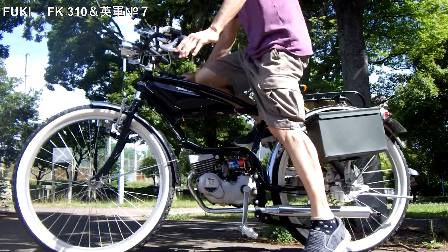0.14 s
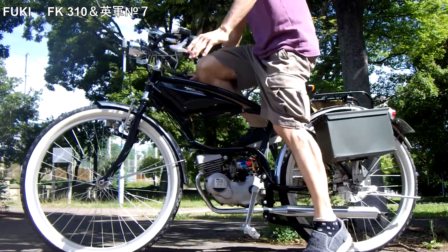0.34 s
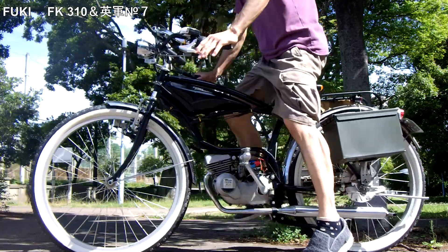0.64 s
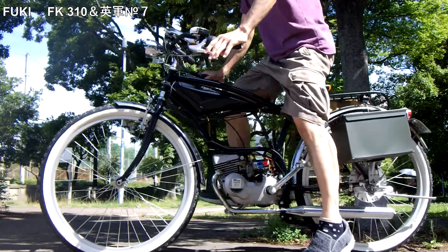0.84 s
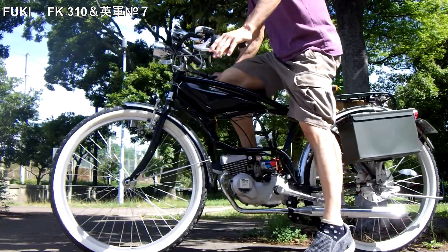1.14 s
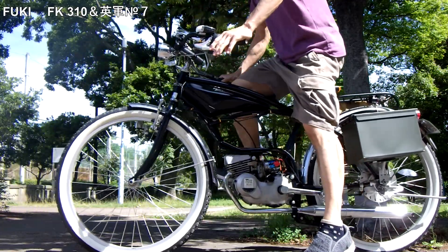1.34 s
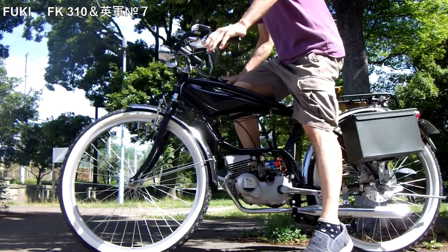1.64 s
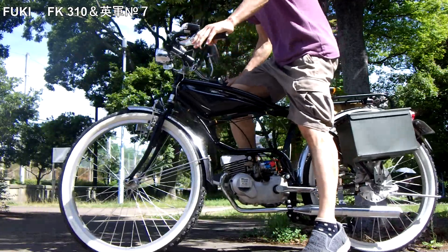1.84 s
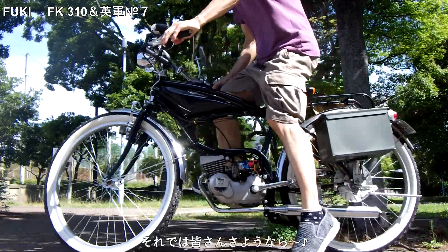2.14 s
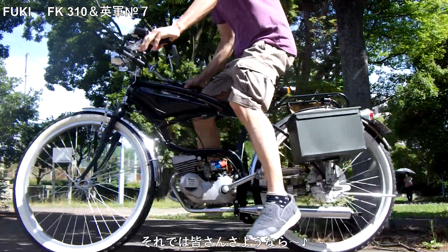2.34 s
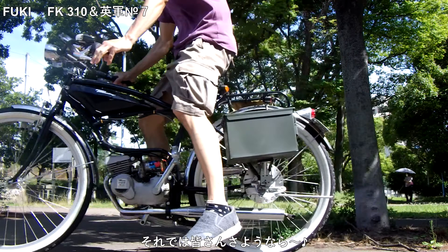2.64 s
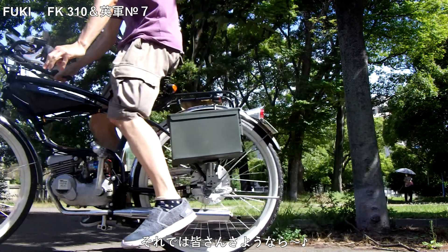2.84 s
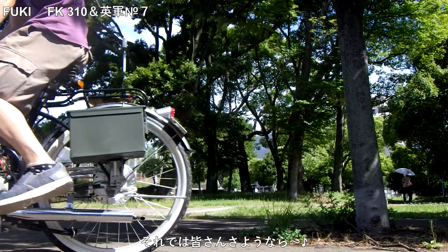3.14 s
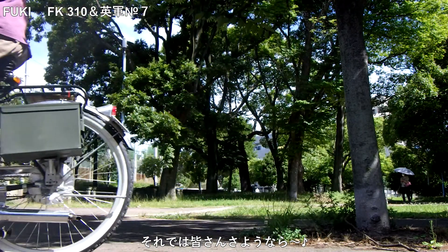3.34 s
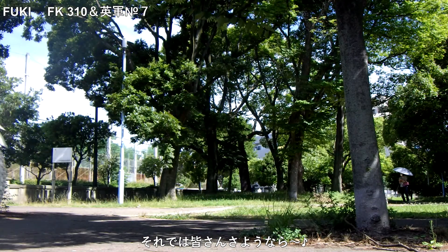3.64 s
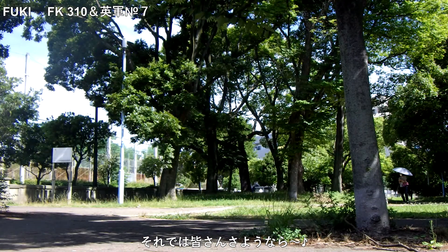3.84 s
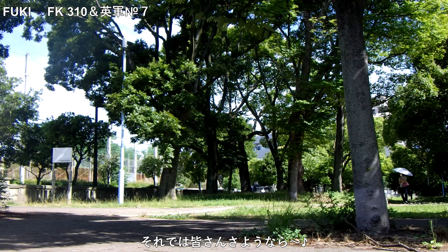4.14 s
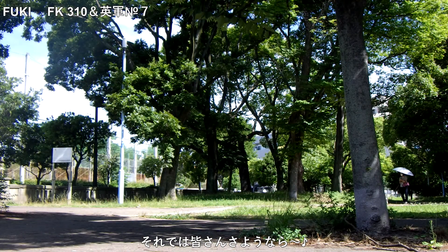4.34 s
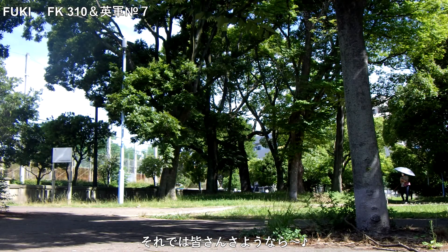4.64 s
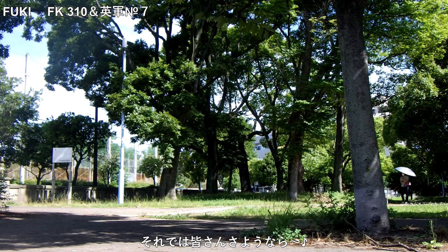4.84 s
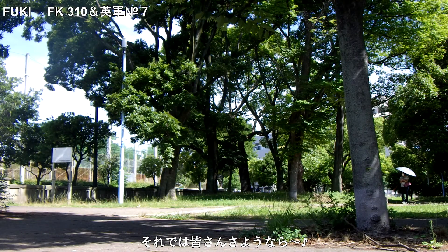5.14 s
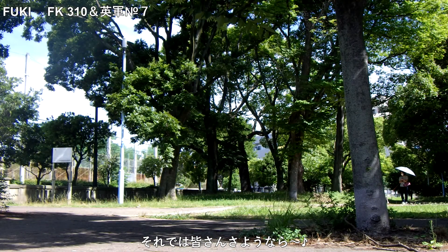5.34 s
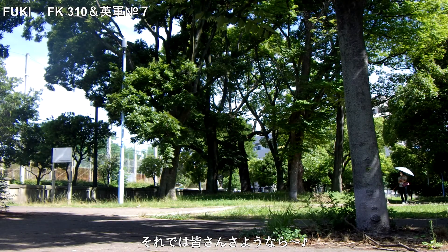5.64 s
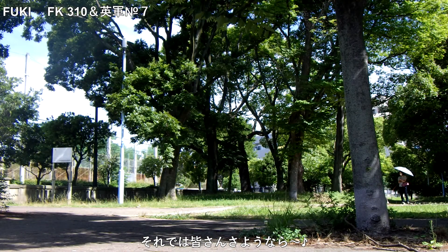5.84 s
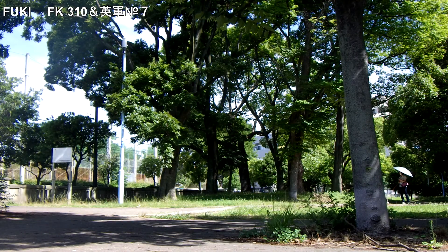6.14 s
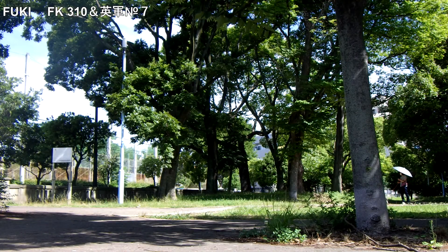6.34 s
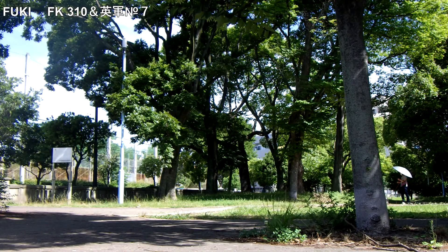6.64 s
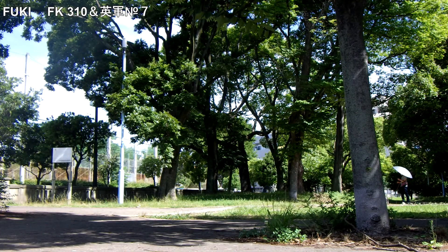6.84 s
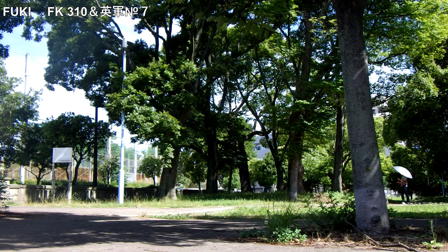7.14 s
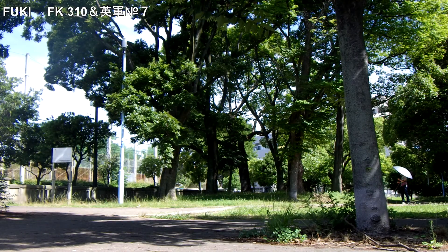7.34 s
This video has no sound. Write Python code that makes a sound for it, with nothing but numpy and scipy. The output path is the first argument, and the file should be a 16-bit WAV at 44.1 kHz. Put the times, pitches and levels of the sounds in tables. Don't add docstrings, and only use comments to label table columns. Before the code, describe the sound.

Close to a low outdoor microphone, a small two-stroke single idles roughly, with irregular ringing pops, case rattle and fine intake hiss. Just before two seconds come a throttle blip and metal clicks; the firing then tightens into a strong, even buzz that rides away, its pitch creeping up. Mechanical detail fades, while the microphone's automatic gain keeps the exhaust prominent over faint traffic and leaves.

```python
import sys
import numpy as np
from scipy import signal
from scipy.fft import rfft, irfft
from scipy.io import wavfile

SR = 44100
rng = np.random.default_rng(int(sys.argv[2]) if len(sys.argv) > 2 else 0)


def gain_from_decibels(decibels):
    exponent = np.asarray(decibels, float) / 20
    return 10 ** exponent


def persist_wave(psi):
    counts = np.round(np.clip(psi, -1, 1) * 32767).astype(np.int16)
    wavfile.write(sys.argv[1], SR, np.atleast_2d(counts).T)


N = 331191
TIME = np.arange(N) / SR

# (time [s], speed [turns/s])
CRANK_SPEED = [(0.0, 44.323), (0.3, 45.834), (0.95, 42.899), (1.35, 43.854), (1.5, 41.036), (1.65, 42.835),
               (1.8, 41.956), (1.95, 45.602), (2.45, 48.711), (4.55, 50.884), (5.05, 52.375), (5.3, 51.947),
               (5.95, 52.894), (6.25, 53.487), (6.45, 52.897), (6.85, 53.686), (7.51, 53.939)]
FIRST_TURN = .011
# (time [s], lag [ms])
JOLTS = [(2.6, 0.39), (2.72, 0.21), (2.97, 0.28), (3.11, 0.45), (3.96, 0.3), (4.52, 0.34), (5.1, 0.51),
         (5.44, 0.23), (6.0, 1.03), (6.13, 0.36), (6.23, 0.64), (6.5, 0.7), (6.79, 0.71)]
JOLT_S, RIDING_TURNS_PER_S = .045, 52
# (time [s], load [0-1], turbulence re exhaust [dB], distance blur [0-1])
LOAD = [(0, 0, -2, .4), (1.82, 0, -2, .4), (1.9, .35, -4, .25), (2.08, .5, -7, .25), (2.17, 1, -13, .35),
        (2.6, 1, -22, .35), (4.5, 1, -23, .5), (5.25, 1, -19, .96), (7.27, 1, -15, .97), (7.3, 0, -2, .97),
        (7.51, 0, -2, .97)]
# (time [s], level [dB])
EXHAUST_LEVEL = [(0, -28.5), (.08, -29), (.42, -33), (1.0, -29), (1.7, -29), (2.08, -25), (2.17, -22.5),
                 (2.5, -23.5), (2.7, -22.5), (3.0, -23), (3.75, -22.5), (4.05, -20), (4.7, -19.5),
                 (5.8, -20), (6.09, -20.5), (7.26, -20), (7.33, -31.5), (7.51, -27)]
# (time [s], boost [dB], half length [s])
BLIPS = [
    (0.21, 6, 0.053),
    (0.563, 0, 0.082),
    (1.008, 2.5, 0.07),
    (1.554, 2, 0.065),
    (1.909, 7, 0.058),
]
# (time [s], level [dB])
AWAY = [(0, -1.5), (2.2, -2.2), (3.1, -3), (3.9, -6), (4.6, -9.5), (4.95, -14), (5.95, -15.5), (6.2, -11.5),
        (7.51, -17)]
# (delay after main puff [turns], pitch [Hz], length [ms], pressure [ratio])
PUFFS = [
    (0, 630, 1.12, 1),
    (-.318, 600, 1.2, -.38),
    (-.187, 352, 4, -.085),
    (0, 455, 4.5, -.04),
    (.205, 830, 1.9, .17),
    (.13, 640, .9, -.1),
    (.44, 650, 1.6, .08),
    (-.007, 1050, 1.4, .065),
    (.01, 1240, 2, .02),
]
# (time [s], delay [ms], level [dB])
WALL_ECHO = [(4.2, 14.5, -26), (4.6, 11.6, -19), (5.0, 9.2, -13), (5.5, 7.5, -7), (5.75, 7.0, -8),
             (5.88, 6.8, -20), (5.95, 7.8, -20), (6.2, 7.4, -9), (7.27, 6.9, -5)]
# (frequency [Hz], width [Hz], level [dB])
PIPE = [(569, 89, 4), (491, 21, -7.5), (682, 257, 0), (384, 124, -10.5), (250, 153, -12.5),
        (1190, 1000, -5)]
# (frequency [Hz], width [Hz], level from the side [dB], level from behind [dB])
BEAM = [(319, 60, 0, -3.5), (421, 37, -12.5, 0.5), (510, 21, 8, 1), (535, 94, -5.5, 1.7),
        (950, 180, -22, -2.5), (1025, 30, -3.5, 2.5), (1280, 140, 1.5, 3)]
TAIL_TURNS_S, TAIL_TURNS_IN_S = 3.84, 0.34
# (time [s], low ring [dB], high ring re low [dB])
FIRINGS = [(0.004, -17, -2.5), (0.069, -13, -5.5), (0.163, -14.5, -2), (0.205, -17, 2), (0.248, -12, -3),
           (0.314, -16.5, -7), (0.379, -17, -2), (0.423, -17, -6), (0.49, -14.5, -2), (0.557, -15, -1.5),
           (0.646, -16.5, 1), (0.715, -15.5, -2.5), (0.782, -14.5, -5), (0.851, -16, -7),
           (0.898, -13.5, -1), (0.992, -15.5, 4), (1.038, -16.5, -3), (1.107, -13, 0.5),
           (1.153, -13.5, 0.5), (1.222, -14, 1), (1.291, -16, -9), (1.314, -15, -3), (1.36, -16, -10),
           (1.429, -11, -9), (1.477, -16, -9), (1.501, -11, -1.5), (1.574, -13.5, 2.5), (1.649, -15.5, 5),
           (1.715, -12.5, -12), (1.762, -14, -14)]
BITE_TURNS, BITE_LAG_S = np.arange(81, 94, 2), .0042
BITE_LOW_DB, BITE_LOW_DB_PER_S, BITE_LOW_FLOOR_DB = -15, -130, -46
BITE_HIGH_DB, BITE_HIGH_DB_PER_S = -11, -34
# (frequency [Hz], t60 [s], level [dB])
SHELL_LOW = [(820, 0.14, -4), (600, .04, -37)]
# (frequency [Hz], t60 [s], level [dB])
SHELL_HIGH = [(1657, 0.064, -2.5), (1901, 0.043, -2.5), (2170, 0.044, -12), (1315, 0.051, -12.5),
              (2594, 0.021, -6)]
# (frequency [Hz], t60 [s], level [dB])
SHELL_HOT = [(1729.3, 0.093, -2), (1975, 0.03, -3.5), (2146, 0.045, -6), (1223, 0.0072, -2)]
# (frequency [Hz], t60 [s], level [dB])
SHELL_HUM = [(851, 0.14, 0)]
# (frequency [Hz], width [Hz], time [s], half length [s], level [dB])
SWING = [
    (1710, 150, 4.03, 0.1, -10),
    (2000, 210, 3.73, 0.22, 7.5),
    (1260, 130, 5, 0.34, 12),
    (1310, 190, 2.32, .15, 11.5),
    (1710, 200, 7.15, .3, -6),
]
# (frequency [Hz], width [Hz], level [dB])
CASE = [(2616, 270, -5), (2750, 260, 1), (3960, 680, -1.5), (4300, 380, -5), (4420, 100, -2.5),
        (4516, 240, -8.5)]
# (frequency [Hz], width [Hz], level [dB])
INTAKE = [
    [(6380, 380, 1), (7450, 310, -10.5)],
    [(10650, 1150, 6), (11420, 600, -12)],
    [(12900, 1800, -21.5), (13600, 700, 7.5), (14300, 700, -1)],
]
INTAKE_FACES_S, INTAKE_FACES_FOR_S = 4.13, 0.68
# (idle [dB], share of blip [ratio], share of fall [ratio], change under load [dB],
# change when the intake faces [dB])
LAYERS = [
    (-33.5, -1.4, 0.31, -1.5, -3),
    (-34, 0.92, 1, 0.5, -2.2),
    (-51, 0.96, 0.71, -1.1, 0.5),
    (-53.5, 0.31, 0.47, -4.5, 5.5),
    (-65.5, .5, .2, 1.3, 9),
]
# (multiple of crank speed [ratio], level [dB])
THUMP = [(1, -63.5), (2, -51), (3, -50.5), (4, -48.5), (5, -47.5)]
# (time [s], level [dB])
CLICKS = [
    (0.1485, -42),
    (0.1924, -36),
    (1.8502, -23),
    (1.8928, -28),
    (1.982, -25.5),
    (2.4697, -31),
]
# (frequency [Hz], level per Hz [dB])
PARK = [(20, -28.5), (59, -12), (193, -17), (300, -6.5), (655, -7.5), (1150, -8.5), (3000, -25.5),
        (6600, -110)]
PARK_DB, PARK_LIFT, PARK_DUCK_DB = -37, 0.24, -2.5
# (frequency [Hz], width [Hz], share removed [ratio])
HOUSING = [(3237, 420, 1), (5240, 550, 1), (5760, 790, 1), (7560, 90, 0.23), (8600, 410, 0.36),
           (13000, 900, .4)]


def crank():
    turns = FIRST_TURN + np.cumsum(controls(CRANK_SPEED)[0]) / SR
    turns = turns - sum(ms / 1000 * RIDING_TURNS_PER_S * bell(s, JOLT_S) for s, ms in JOLTS)
    beats = np.interp(np.arange(1, int(turns[-1])), turns, TIME)
    return turns, beats


def exhaust(beats, load):
    loose = 1 - np.interp(beats, TIME, load)
    chance = rng.standard_normal((len(beats), len(PUFFS) + 1, 2))
    size = gain_from_decibels((.5 + 2 * loose)[:, None] * chance[..., 0])
    slip_s = (3e-5 + 6e-4 * loose)[:, None] * chance[..., 1]
    period = np.gradient(beats)
    out = 0
    for k, (after, hz, ms, pressure) in enumerate(PUFFS):
        out = out + puff(beats + after * period + slip_s[:, k], pressure * size[:, k], hz, ms)
    s, delay_ms, db = np.transpose(WALL_ECHO)
    back = beats + np.interp(beats, s, delay_ms) / 1000 + 2 * slip_s[:, -1]
    echo = puff(back, gain_from_decibels(np.interp(beats, s, db)) * size[:, -1], 630, 1.5)
    return level(out + echo)


def puff(s, size, hz, ms):
    t = np.arange(-400, 401) / SR
    shape = np.exp(-(t * 1000 / ms) ** 2 / 2) * np.cos(2 * np.pi * hz * t)
    return signal.fftconvolve(taps(s, size), shape, "same")


def tumbling_gas(turns, blow, blur):
    return level(body(gated(turns, gain_from_decibels(blow), .8, 0.32, .5 + blur / 2), PIPE))


def beamed(gas, load):
    behind = 1 / (1 + np.exp((TAIL_TURNS_S - TIME) / TAIL_TURNS_IN_S))
    for hz, width, side_db, behind_db in BEAM:
        view_db = side_db + (behind_db - side_db) * behind
        gas = gas + (gain_from_decibels(load * view_db) - 1) * band(gas, hz, width)
    return gas + (gain_from_decibels(4.7 * (1 - load)) - 1) * band(gas, 393, 89)


def idle_firings(beats):
    s, low_db, high_db = firings(beats)
    n = np.arange(400)
    shake = np.exp(-n / (0.0015 * SR)) * np.sin(2 * np.pi * 820 * n / SR)
    low = signal.fftconvolve(taps(s, gain_from_decibels(low_db)), shake)[:N]
    crack = taps(s, gain_from_decibels(low_db + high_db))
    rattle = np.exp(-(np.arange(1200) / (.013 * SR)) ** 4)
    high = signal.fftconvolve(crack, rattle)[:N] * rng.standard_normal(N)
    idle = beats[:BITE_TURNS[0]]
    low = low + taps(idle + BITE_LAG_S, gain_from_decibels(-4.5 + 2.7 * rng.standard_normal(len(idle))))
    return gain_from_decibels(-32.5) * ring(low, SHELL_LOW) + ring(gain_from_decibels(-31.5) * high + gain_from_decibels(-10) * crack, SHELL_HIGH)


def firings(beats):
    s = beats[BITE_TURNS - 1] + BITE_LAG_S
    since = s - s[0]
    low_db = np.maximum(BITE_LOW_DB + BITE_LOW_DB_PER_S * since, BITE_LOW_FLOOR_DB)
    high_db = BITE_HIGH_DB + BITE_HIGH_DB_PER_S * since - low_db
    return np.hstack([np.transpose(FIRINGS), [s, low_db, high_db]])


def loaded_firings(beats, modes, lag_s):
    size = gain_from_decibels(0.39 * rng.standard_normal(len(beats)))
    return level(ring(taps(beats + lag_s, size), modes))


def hot_shell(turns, beats, blow, load, blur):
    struck = load * gain_from_decibels(1.0 - 6.4 * blur ** 2) * loaded_firings(beats, SHELL_HOT, .0042)
    blown = gain_from_decibels(-6.5) * level(ring(gated(turns, gain_from_decibels(2 * blow), 0.23, 0.33, blur), SHELL_HOT))
    return swung(struck + blown)


def swung(shell):
    for hz, width, s, half, db in SWING:
        shell = shell + (gain_from_decibels(db * bell(s, half)) - 1) * band(shell, hz, width)
    return shell


def case_rattle(turns, knock, blur):
    return level(body(gated(turns, gain_from_decibels(3.9 * np.clip(knock, -2, 1.6)), 0.68, 0.19, blur), CASE))


def intake_hiss(turns, knock, blur, levels_db):
    hiss = 0
    for db, peaks in zip(levels_db, INTAKE):
        size = gain_from_decibels(1.5 * knock + 1.8 * rng.standard_normal(len(knock)))
        gasp = gated(turns, size, .62, .12, blur ** 3)
        hiss = hiss + gain_from_decibels(db) * level(body(gasp, peaks))
    return hiss


def crank_thump(turns, load):
    orders = sum(gain_from_decibels(db) * np.sin(2 * np.pi * k * (turns + 0.169)) for k, db in THUMP)
    return orders * (0.41 + 0.92 * load)


def clicks():
    s, db = np.transpose(CLICKS)
    tick = signal.fftconvolve(taps(s, gain_from_decibels(db + 3)), np.exp(-np.arange(900) / (.002 * SR)))[:N]
    noise = rng.standard_normal(N)
    return tick * (band(noise, 12700, 8000) + gain_from_decibels(14.0) * band(noise, 4300, 600))


def park():
    hz, db = np.transpose(PARK)
    f = np.fft.rfftfreq(N, 1 / SR) + 1
    colour = gain_from_decibels(np.interp(np.log(f), np.log(hz), db))
    return gain_from_decibels(PARK_DB) * level(irfft(rfft(rng.standard_normal(N)) * colour, N))


def level(x):
    return x / np.sqrt(np.mean(x ** 2))


def taps(s, size):
    at = np.clip(np.asarray(s) * SR, 0, N - 2)
    out, i = np.zeros(N), at.astype(int)
    np.add.at(out, i, size * (1 - at + i))
    np.add.at(out, i + 1, size * (at - i))
    return out


def ring(x, modes):
    out = 0
    for k, (hz, t60, db) in enumerate(modes):
        pole = np.exp(2j * np.pi * hz / SR - np.log(1000) / (t60 * SR))
        out = out + (-1) ** k * gain_from_decibels(db) * signal.lfilter([1], [1, -pole], x).imag
    return out


def band(x, hz, width):
    return signal.lfilter(*signal.iirpeak(hz, hz / width, SR), x)


def body(x, peaks):
    out = 0
    for hz, width, db in peaks:
        once = band(x, hz, 1.67 * width)
        out = out + gain_from_decibels(db) * band(once, hz, 1.67 * width) / np.sqrt(width)
    return out


def gated(turns, size, start, decay, blur):
    since = turns - start
    rise = since % 1 / decay
    turn = np.clip(since, 0, len(size) - 1).astype(int)
    burst = level(size[turn] * rise * np.exp(-rise))
    return (np.sqrt(1 - blur) * burst + np.sqrt(blur)) * rng.standard_normal(N)


def controls(table):
    t, *columns = np.transpose(table)
    return [np.interp(TIME, t, c) for c in columns]


def bell(s, width):
    return np.exp(-((TIME - s) / width) ** 2 / 2)


def scene():
    turns, beats = crank()
    load, rough_db, blur = controls(LOAD)
    blip_db = sum(db * bell(s, half) for s, db, half in BLIPS)
    facing = bell(INTAKE_FACES_S, INTAKE_FACES_FOR_S)
    pipe_db, away_db = controls(EXHAUST_LEVEL)[0] + blip_db, controls(AWAY)[0]
    shell_db, case_db, *hiss_db = [
        idle_db + blip * blip_db + fall * away_db + load_db * load + facing_db * facing
        for idle_db, blip, fall, load_db, facing_db in LAYERS]
    blow, knock = rng.standard_normal((2, len(beats) + 2))
    puffs = (.45 + .55 * load) * exhaust(beats, load)
    gas = beamed(puffs + gain_from_decibels(rough_db) * tumbling_gas(turns, blow, blur), load)
    shell = hot_shell(turns, beats, blow, load, blur)
    hum = load * gain_from_decibels(5) * loaded_firings(beats, SHELL_HUM, .0036)
    case = case_rattle(turns, knock, blur)
    engine = gain_from_decibels(pipe_db) * gas + gain_from_decibels(shell_db) * shell + gain_from_decibels(case_db) * (case + hum)
    engine += intake_hiss(turns, knock, blur, hiss_db) + crank_thump(turns, load)
    park_gain = gain_from_decibels(PARK_DUCK_DB * load - PARK_LIFT * away_db)
    return (engine + idle_firings(beats) + clicks() + park_gain * park())[None]


def band_limit(x):
    return signal.sosfilt(signal.butter(12, 16010, fs=SR, output="sos"), x)


def record(dry):
    x = signal.sosfilt(signal.ellip(8, .2, 60, 14700, fs=SR, output="sos"), dry)
    for hz, width, share in HOUSING:
        x = x - np.clip(share, 0, 1) * band(x, hz, width)
    return band_limit(x)


dry = scene()
out = record(dry)
persist_wave(out)
```